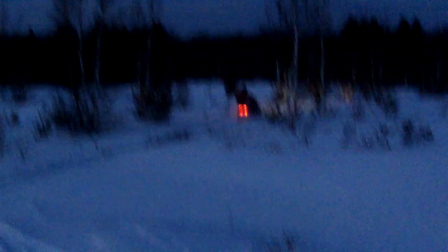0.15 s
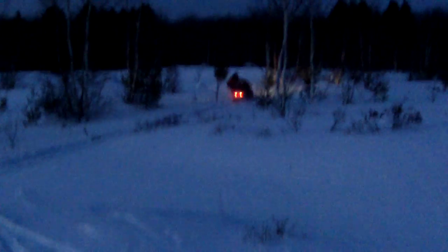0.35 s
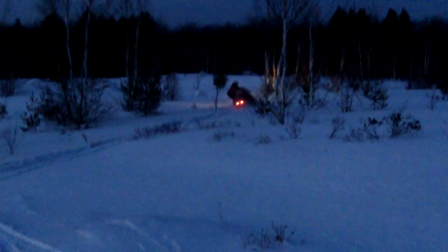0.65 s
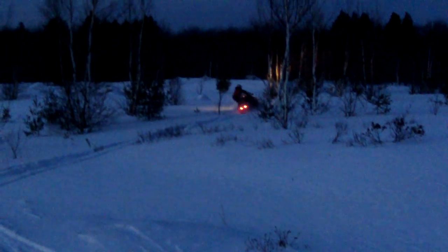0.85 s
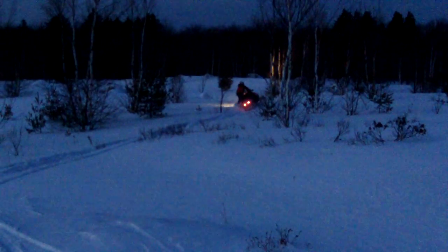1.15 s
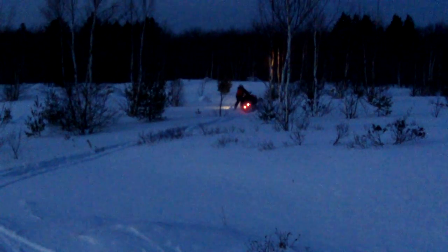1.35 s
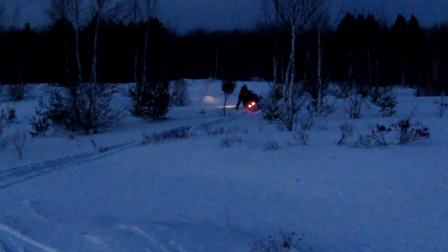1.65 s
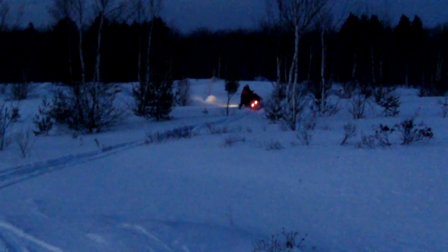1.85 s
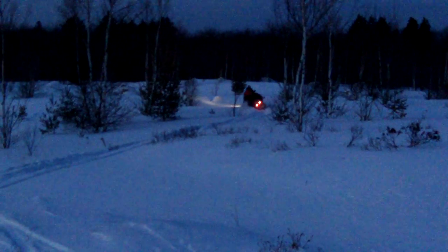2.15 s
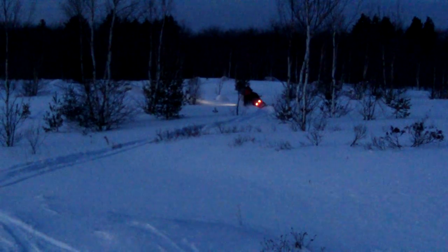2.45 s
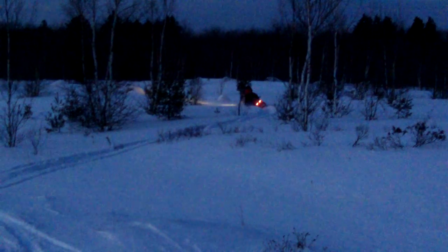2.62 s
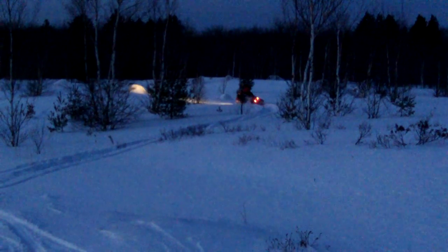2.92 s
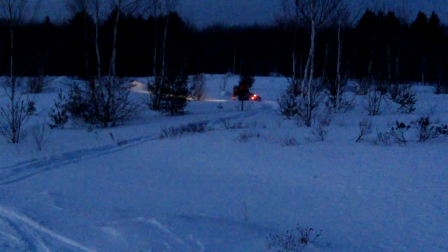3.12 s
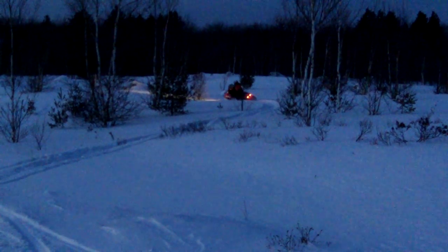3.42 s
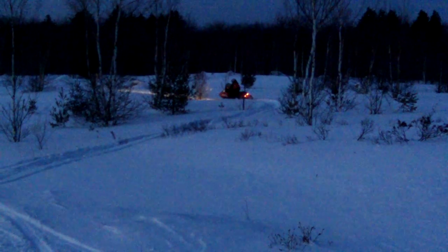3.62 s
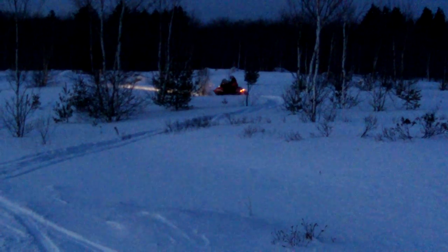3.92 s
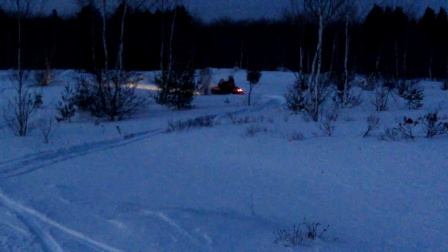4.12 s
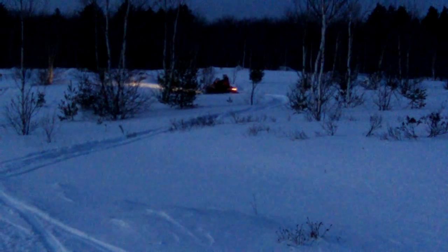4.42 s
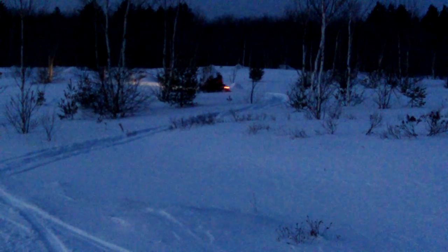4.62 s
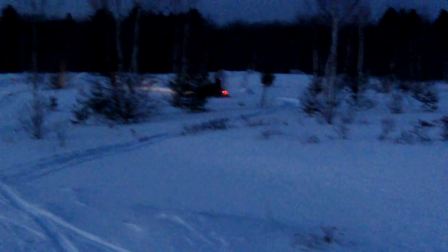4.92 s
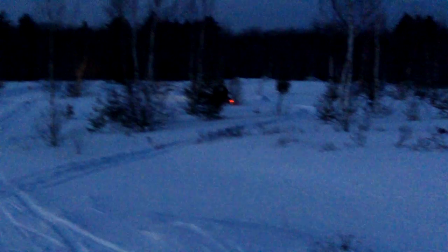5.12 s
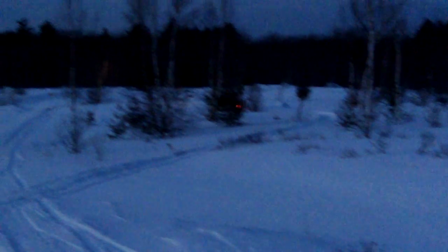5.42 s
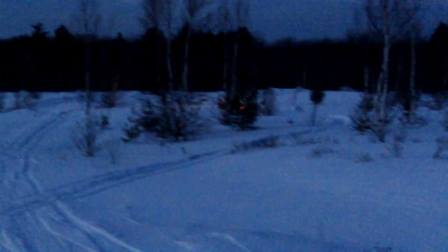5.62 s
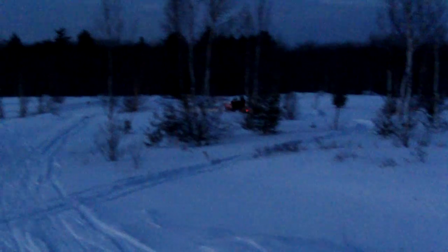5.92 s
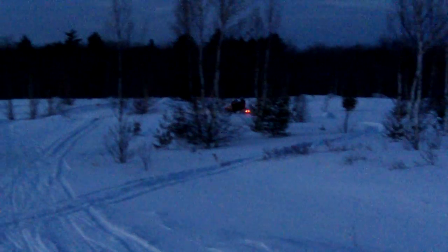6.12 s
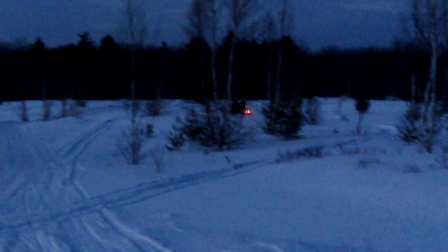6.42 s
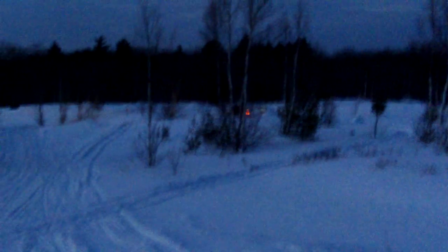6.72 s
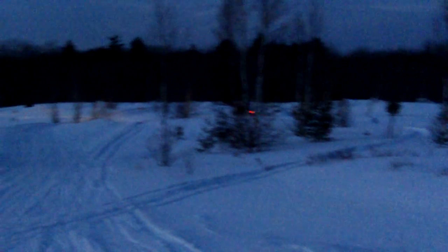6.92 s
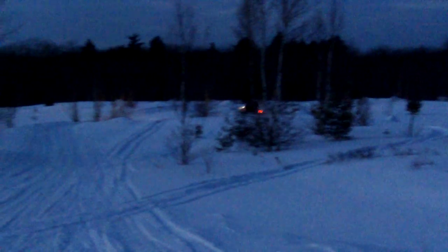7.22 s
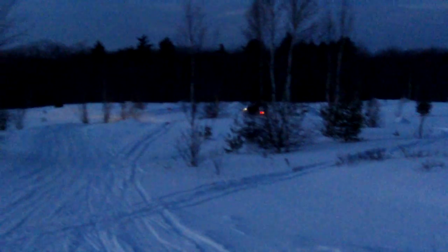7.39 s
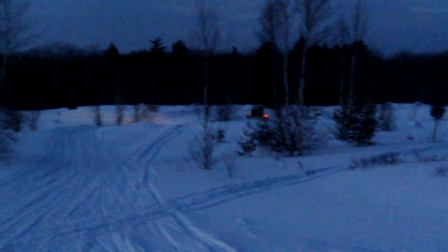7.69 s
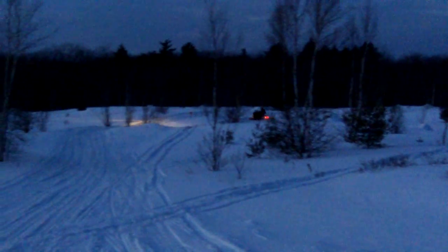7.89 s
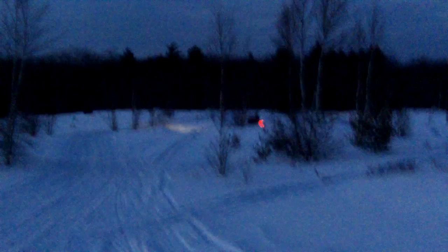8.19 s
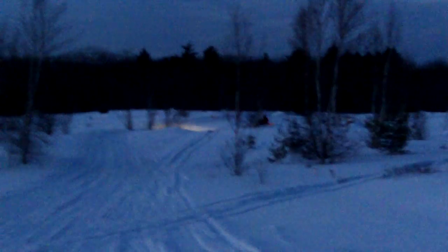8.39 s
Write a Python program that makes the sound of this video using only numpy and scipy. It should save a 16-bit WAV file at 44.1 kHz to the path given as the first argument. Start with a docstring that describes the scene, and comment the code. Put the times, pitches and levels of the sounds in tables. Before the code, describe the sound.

A two-stroke snowmobile buzzes and growls away over snow, revs hard once, then fades into the distance before cloth rustle and handling knocks.

```python
"""A two-stroke twin snowmobile rides away over snow: exhaust orders drone and growl, noise bands churn snow.
It revs up, chokes for a moment before 1.1 s, then cruises; scattered tree echoes spread the exhaust pops.
A small camera whistles faintly throughout and ticks after 4 s; the hardest rev peaks at 5.4 s.
Snow and engine then recede; from 8.1 s a sleeve rustles and a gloved hand knocks, both shaped noise."""
import sys
import numpy as np
from scipy import signal
from scipy.fft import rfft, irfft, next_fast_len
from scipy.io import wavfile
from scipy.ndimage import map_coordinates

SR = 44100
rng = np.random.default_rng(int(sys.argv[2]) if len(sys.argv) > 2 else 0)


def wrap_up_sound(samples):
    """Save the sound to the file named by the first command line argument, as 16-bit audio."""
    columns = np.atleast_2d(samples).T
    # keep every value between -1 and 1, then stretch to whole-number steps
    tamed = np.clip(columns, -1, 1)
    steps = np.round(tamed * 32767).astype(np.int16)
    wavfile.write(sys.argv[1], SR, steps)


N = 377048
TIME_S = np.arange(N) / SR
CUTOFF_HZ = 15300

# engine speed: (time [s], firing rate [Hz])
FIRING = [(0.0, 149.0), (0.24, 137.8), (0.4, 145.2), (0.6, 156.1), (0.8, 169.3), (0.96, 145.8),
          (1.1, 135.5), (1.6, 149.0), (1.92, 150.4), (2.2, 147.5), (2.56, 148.5), (2.83, 140.5),
          (3.05, 146.0), (3.2, 147.5), (3.85, 147.0), (4.24, 154.0), (4.45, 151.0), (4.7, 159.3),
          (4.8, 167.3), (4.9, 177.6), (5.02, 194.7), (5.18, 222.3), (5.32, 247.8), (5.4, 259.0),
          (5.5, 228.0), (5.66, 188.8), (5.8, 175.7), (6.02, 176.7), (6.25, 188.7), (6.5, 162.5),
          (6.85, 143.2), (7.38, 138.7), (7.65, 152.4), (7.86, 157.3), (8.1, 151.8), (8.55, 151.3)]
CRUISE_HZ = 150
# throttle squeezes: (start [s], end [s], opening [0-1], periodic share of the bark [0-1])
SQUEEZES = [(0.432, 0.8, 0.47, 0.7), (1.043, 2.604, 0.57, 0.38), (2.91, 3.496, 0.48, 0.27),
            (3.507, 4.595, 0.34, 0.51), (4.607, 5.412, 0.5, 0.59), (5.785, 6.292, 0.44, 0.49),
            (7.58, 7.965, 0.65, 0.39)]
OPEN_S, CLOSE_S = 0.15, 0.22  # throttle ramp lengths
COAST_SHARE = 0.4  # periodic share off the throttle
# throttle snapped shut: (start [s], end [s], gain of the exhaust orders [dB])
CHOP = (0.79, 1.08, -9)
CATCH_S = 0.056  # ramp back to full exhaust
# engine carry as the sled turns and recedes, used about its mean: (time [s], level [dB])
CARRY = [(0.0, -37.5), (0.1, -42.5), (0.45, -41.5), (0.6, -38), (0.68, -37.5), (0.88, -40.5), (1.2, -39.5),
         (2.0, -39), (2.6, -38), (2.8, -43.5), (3.3, -40.5), (3.5, -43), (4.6, -44), (4.8, -41.5),
         (5.3, -33.5), (5.4, -35), (6.0, -40), (6.2, -39.5), (6.5, -41.5), (7.6, -49), (7.75, -43),
         (8.55, -56)]
# churned snow, used about its mean: (time [s], level [dB])
SNOW = [(0.0, -40.5), (0.5, -41), (0.7, -37.5), (1.4, -46), (1.6, -46.5), (1.9, -52), (2.6, -48),
        (2.7, -51.5), (4.2, -52), (4.3, -52), (4.8, -51), (5.0, -44.5), (5.5, -53), (6.2, -49), (6.8, -58),
        (7.1, -56), (7.3, -58), (8.55, -61)]

# level laws: (offset coasting at cruise [dB], slope with speed [dB/octave], lift at full throttle [dB],
#              share of engine swing [dB/dB], share of snow swing [dB/dB])
BARK_LAW = (-50, 4.5, 0.5, 0.35, 0.56)
RASP_LAW = (-44.5, 3.5, -2.5, 1, 0.4154)
CLATTER_LAW = (-53.5, 11.5, 4, 0, 0.75)
SCRAPE_LAW = (-57.5, 10.5, 0, 0.41, 0.94)
SPRAY_LAW = (-58, 5.5, 1, 0.5, 1)
RUMBLE_LAW = (-55, -8, -3, 1.16, 0.02)
THRUM_LAW = (-82.5, -18, -13, 2, -0.06)
DRONE_LAW = (-0.32, 1, 1, 0.23, 0.028)
GROWL_LAW = (-59.5, 8, 5.5, 0.68, 0.2)
# low mids, added to the bark law: (time [s], level [dB])
LOW_MIDS = [(0, 1), (.42, -0.5), (.66, 2.5), (1.2, 4.5), (1.87, 6), (2.4, -0.5), (3.1, 1), (4, 0), (5, 5),
            (6.7, 3), (8.55, 0)]
# upper mids, added to the clatter law: (time [s], level [dB])
UPPER_MIDS = [(0, -1.5), (.95, 4), (1.6, -2.5), (2.6, -0.5), (3.55, 2.5), (4.5, 3), (5.3, 2), (6, -2.5),
              (7, -2.5), (7.85, 1), (8.55, -8.5)]

# exhaust pop spectrum: (frequency [Hz], relative gain [dB])
PIPE_COLOUR = [(150, -70), (330, -14), (520, -20.5), (750, -2), (1000, 9), (1350, 2), (1700, 7), (2300, 5),
               (3000, -9)]
PIPE_DELAY_S = 0.018  # a pop leaves the cylinder this long before it is heard
POPS_IN_BARK_DB = -5  # in the mids the growl covers the single pops
# engine and track noise spectrum: (frequency [Hz], relative gain [dB])
COLOUR = [(60, -47), (120, -29.5), (200, -25.5), (330, -14), (600, -5.5), (1000, 10), (2200, 16),
          (3000, 1.5), (4500, -4.5), (6500, -13), (9200, -23), (10500, -29.5), (12000, -28.5), (15000, -39)]
# hood and chassis resonances and dips: (centre [Hz], width [Hz], gain [dB])
PANELS = [(994, 39, 1.5), (1140, 110, 1.5), (1490, 110, -8.5), (1595, 390, 9.5), (2315, 120, 3),
          (2574, 400, 9.5), (2830, 100, -3.5), (3330, 69, 2), (4500, 120, -3), (6040, 300, 2),
          (7000, 350, 0), (8270, 270, 3), (9270, 960, 3.5)]
# share of noise carrying the chassis resonances, less as the sled recedes: (time [s], share [0-1])
NEARNESS = [(0, 0.74), (1, 1), (1.8, 0.74), (2.6, 1), (3.5, 0.88), (5, 0.91), (6, 0.42), (8.55, 0.08)]
# tuned pipe's response to the lowest orders: (frequency [Hz], level [dB])
PIPE_TONES = [(135, -86), (180, -77), (260, -70), (300, -65.5), (360, -63.5), (430, -52), (470, -61.5),
              (520, -57), (590, -51), (660, -48), (760, -52), (1000, -48)]
BOOM_DB = 7.5  # lift of the two lowest orders at full throttle
# level offset of firing orders 1 to 4, one table each: (time [s], level [dB])
FIRST = [(0, 8.5), (1, 6), (2.85, 2), (3.8, 2), (4.2, -5.5), (5.25, -0.5), (5.5, 3), (7.3, -9.5), (8.55, 2)]
SECOND = [(0, 1.5), (1.6, 6.5), (2.55, -6), (2.9, 0.5), (4.55, 5.5), (5.15, 4.5), (5.5, -17), (6, 3.5),
          (6.4, -24), (7.1, -10), (7.6, 1.5), (8.55, -23)]
THIRD = [(0, -12), (.7, 5.5), (1.1, -3.5), (1.6, 2), (2.6, -3), (3.6, 2), (4.7, -8), (5.3, -11), (5.44, 3),
         (5.56, -9), (6.8, -8.5), (7.35, 1), (7.7, -11), (8.55, 0)]
FOURTH = [(0, -3), (.5, -4), (.66, 6), (.8, 3), (.9, -5), (1.8, 4), (2.6, -1), (3.08, -26), (3.45, -2),
          (4.0, -4), (4.3, -19), (4.7, -4), (4.9, -31), (5.7, -14), (5.88, 2.5), (6.3, -7), (6.45, -7),
          (6.58, -1.5), (7.3, -9), (7.8, -3), (8.55, -9.5)]
# growl orders; half orders come from the unequal cylinders: (firing order [-], relative level [dB])
GROWL_ORDERS = [(1.5, -4), (2.5, -4), (3.5, 2), (4.5, 0.5), (5, 0.5), (5.5, 0), (6, 5), (6.5, 0), (7, 1),
                (7.5, -0.5), (8, -2.5), (8.5, 1), (9, 0.5), (9.5, -1), (10, 0.5), (10.5, -4), (11, 1),
                (11.5, -4), (12, 0), (12.5, -3), (13, -2), (13.5, -4), (14, 0), (15, -1), (16, 0), (17, -1),
                (18, -3)]
# pipe's response to the growl orders: (frequency [Hz], gain [dB])
GROWL_COLOUR = [(220, -28), (350, -15), (500, -6), (610, -5), (700, 0), (820, -0.5), (930, 1), (1030, 3),
                (1200, 1), (1450, 1), (1700, 3), (2000, 0), (2300, 0.5), (2650, -1), (3100, -9),
                (4200, -15)]
# whines of pipe, fan or cover: (start [s], end [s], firing order [-], level at mid-swell [dB])
WHINES = [(0.31, 0.44, 11, -47), (0.35, 0.48, 7, -54), (0.78, 0.9, 9.5, -47), (1.29, 1.49, 11, -48.5),
          (1.35, 2.05, 7, -57), (0.52, 0.8, 10, -52), (1.5, 2.15, 6.5, -52), (2.85, 3.04, 15, -48),
          (2.9, 3.3, 18, -51), (2.94, 3.42, 11, -47), (3.5, 3.85, 11, -58), (3.65, 4.15, 5.5, -56),
          (3.15, 3.4, 15, -56), (3.45, 3.8, 22.5, -55), (4.08, 4.5, 7.5, -59), (4.48, 4.76, 4.5, -60),
          (4.55, 4.73, 14, -55), (5.2, 5.4, 7, -46), (5.22, 5.38, 7.5, -48), (5.85, 6.35, 11, -56),
          (5.9, 6.4, 13, -54), (7.05, 7.55, 5.5, -67), (7.62, 7.98, 6, -59)]
# ringing cover, chassis and running gear: (start [s], end [s], pitch [Hz], width [Hz], level [dB])
RINGS = [(0.0, 0.55, 5360, 220, -52.5), (0.2, 0.5, 3300, 130, -50), (0.5, 1.11, 5340, 280, -46),
         (0.78, 1.082, 1560, 200, -42), (2.147, 2.7, 1650, 150, -46.5), (2.15, 2.6, 3270, 130, -56),
         (4.852, 5.2, 4380, 450, -45.5), (5.2, 5.35, 2560, 150, -40), (5.45, 5.847, 2200, 220, -46),
         (5.897, 6.416, 2310, 170, -43), (5.95, 6.748, 4350, 480, -54.5), (6.95, 7.2, 6750, 650, -60.5),
         (7.5, 8.0, 5400, 480, -65), (7.55, 8.0, 1920, 220, -65)]

# grazing echo off the snow, shifting as the sled turns: (time [s], lag [ms], strength [0-1])
GLANCE = [(1.1, .25, 0), (1.5, .25, .07), (2.5, .25, .07), (3, .2, .05), (4.6, .18, .05), (5.3, .2, 0),
          (5.7, .26, .13), (6.3, .305, .22), (6.85, .36, .22), (7.4, .4, .22), (7.8, .42, .28),
          (8.55, .43, .1)]
# echoes off bumps in the snow
BUMP_STRENGTH, BUMP_CHANGE_HZ = 0.2, 0.8

# camera whistle: (pitch [Hz], warble [Hz], warble depth [rad], level [dB])
WHISTLE = (7867, 30, 1.9, -65.3)
# camera body ticks: (time [s], relative envelope peak [dB])
TICKS = [(4.1579, -40), (4.1754, -31), (4.1885, -33), (4.584, -35)]
# gloved hand knocks: (time [s], relative envelope peak [dB])
KNOCKS = [(8.421, -36), (8.443, -42), (8.458, -52), (8.480, -30.5), (8.534, -31)]
# sleeve rustle: (time [s], level [dB])
RUSTLE = [(0, -100), (8.1, -67), (8.23, -52), (8.32, -57.5), (8.4, -55), (8.44, -49.5), (8.49, -48),
          (8.55, -54)]
# rubbing cloth spectrum: (frequency [Hz], relative gain [dB])
CLOTH = [(40, -38), (110, -21), (200, -10), (600, 0.5), (2000, -7.5), (6000, -15), (15000, -28)]
# still air and microphone hiss spectrum: (frequency [Hz], relative gain [dB])
AIR = [(30, -19), (100, -8), (400, -29), (1500, -15), (5000, -12), (9000, 8), (11000, -1), (15000, 1.5)]


def sled():
    """Firing rate and throttle drive every exhaust, engine and track layer."""
    firing_hz = in_time(FIRING)[0]
    cycle = np.cumsum(firing_hz) / SR  # firings so far
    opening, share = throttle()
    state = controls(firing_hz, opening)
    low_orders = level(DRONE_LAW, state) * drone(cycle, firing_hz, opening, flutter_db=1.2, wobble_rad=0.061)
    mid_orders = growl(cycle, firing_hz, flutter_db=2.8, wobble_rad=0.045)
    mid_orders = level(GROWL_LAW, state) * share * mid_orders  # growl needs even firing
    high_orders = whine(cycle, flutter_db=1.2, wobble_rad=0.12)
    body = machine(cycle, firing_hz, share, state)
    return body + choke() * (low_orders + mid_orders) + high_orders + rings(cycle, throb=0.42)


def drone(cycle, firing_hz, opening, flutter_db, wobble_rad):
    """The tuned pipe sings the four lowest firing orders as near-pure tones; throttle swells the lowest two."""
    out = np.zeros(N)
    points_hz, points_db = np.transpose(PIPE_TONES)
    for order, curve in enumerate((FIRST, SECOND, THIRD, FOURTH), 1):
        db = np.interp(np.log(order * firing_hz), np.log(points_hz), points_db)
        db = db + in_time(curve)[0] + BOOM_DB * opening * (order <= 2)
        gain = from_db(db + flutter_db * drift(31))
        phase = 2 * np.pi * order * cycle + wobble_rad * order * drift(19)
        out += np.sqrt(2) * gain * np.sin(phase)
    return out


def growl(cycle, firing_hz, flutter_db, wobble_rad):
    """Whole and half orders of the two unequal cylinders sweep through the pipe's resonances."""
    out = np.zeros(N)
    points_hz, points_db = np.transpose(GROWL_COLOUR)
    for order, order_db in GROWL_ORDERS:
        db = np.interp(order * firing_hz, points_hz, points_db) + order_db
        gain = from_db(db + flutter_db * drift(10.0))
        phase = 2 * np.pi * order * cycle + spread_rad(order) + wobble_rad * order * drift(21.5)
        out += np.sqrt(2) * gain * np.sin(phase)
    return out


def spread_rad(order):
    """The pipe delays each order differently, so a firing is a drawn-out bark, not a click."""
    return np.sqrt(2) * order ** 2


def whine(cycle, flutter_db, wobble_rad):
    """Single firing orders sing out and fade over set spans, gliding with engine speed."""
    out = np.zeros(N)
    flutter = from_db(flutter_db * drift(18))
    waver = wobble_rad * drift(8.9)
    for start_s, end_s, order, db in WHINES:
        on, swell = rise_and_fall(start_s, end_s)
        tone = np.sin(2 * np.pi * order * cycle[on] + waver[on])
        out[on] += np.sqrt(2) * from_db(db) * swell * flutter[on] * tone
    return out


def machine(cycle, firing_hz, share, state):
    """Exhaust pops and engine and track noise in bands; the periodic share sets the mix in bark and edge."""
    pops = exhaust(cycle, firing_hz)
    noise = rasp(cycle, throb=0.034, half_throb=0.028, judder_db=0.7)
    rumble = band(noise, 100, 680) + 0.65 * np.sqrt(share) * band(pops, 220, 680)
    rumble = level(RUMBLE_LAW, state) * rumble
    thrum = level(THRUM_LAW, state) * band(rng.standard_normal(N), 50, 144, order=1)
    bark = blend(pops, noise, share, 624, 1468, POPS_IN_BARK_DB)
    bark = level(BARK_LAW, state) * from_db(in_time(LOW_MIDS)[0]) * bark
    # higher up, pulses need a larger share to stand out of the turbulence
    edge = level(RASP_LAW, state) * blend(pops, noise, share ** 1.8, 1534, 5230)
    clatter = level(CLATTER_LAW, state) * from_db(in_time(UPPER_MIDS)[0]) * band(noise, 2835, 4160)
    scrape = level(SCRAPE_LAW, state) * band(noise, 4180, 7360)
    spray = level(SPRAY_LAW, state) * band(noise, 7150, 17600)
    clumps = from_db(0.59 * drift(49))  # the track throws snow in lumps
    return thrum + np.sqrt(choke()) * (rumble + bark) + edge + clatter + clumps * (scrape + spray)


def exhaust(cycle, firing_hz):
    """Pops pass the ringing pipe, scatter off trees and glance off the snow."""
    pops = exhaust_pulses(cycle, firing_hz, jitter_s=0.000018, uneven=0.037, weak_db=-7.5, skew=0.058)
    pops = trees(pipe(pops, smear_s=0.034), wet_db=-3, t60_s=0.12)
    return glance(coloured(pops, PIPE_COLOUR))


def exhaust_pulses(cycle, firing_hz, jitter_s, uneven, weak_db, skew):
    """One pop per firing; the second cylinder is weaker and late, which adds half orders."""
    number = np.arange(int(cycle[-1]))
    second = number % 2
    chance = rng.standard_normal((len(number), 2))
    at_s = np.interp(number + skew * second, cycle, TIME_S) - PIPE_DELAY_S + jitter_s * chance[:, 0]
    at = np.clip((at_s * SR).astype(int), 0, N - 1)
    pops = np.zeros(N)
    pops[at] = from_db(weak_db * second) * (1 + uneven * chance[:, 1])
    return rms_one(pops / np.sqrt(firing_hz))  # even power at any speed


def pipe(x, smear_s):
    """The expansion chamber spreads each pop over several firings, lows last."""
    size = next_fast_len(N + SR // 10)
    hz = np.fft.rfftfreq(size, 1 / SR)
    lag_s = smear_s * np.exp(-hz / 1500)
    phase_turns = np.cumsum(lag_s) * SR / size  # group delay summed over frequency
    return irfft(rfft(x, size) * np.exp(-2j * np.pi * phase_turns), size)[:N]


def rasp(cycle, throb, half_throb, judder_db):
    """Turbulence and rattle surge with each firing and judder at random; the chassis colours them when near."""
    surge = 1 + throb * np.cos(2 * np.pi * cycle) + half_throb * np.cos(np.pi * cycle)
    rattle = rng.standard_normal(N) * surge * from_db(judder_db * drift(26))
    near = np.clip(in_time(NEARNESS)[0], 0, 1)
    ringing, plain = coloured(rattle, COLOUR, PANELS), coloured(rattle, COLOUR)
    return bumps(glance(near * ringing + (1 - near) * plain))


def blend(pops, noise, share, low_hz, high_hz, pops_db=0):
    """One band of pops and noise, mixed by power share."""
    periodic = from_db(pops_db) * np.sqrt(share) * band(pops, low_hz, high_hz)
    return periodic + np.sqrt(1 - share) * band(noise, low_hz, high_hz)


def rings(cycle, throb):
    """Rattle pulsing with the firing excites one narrow panel or running-gear resonance at a time span."""
    out = np.zeros(N)
    rattle = rng.standard_normal(N) * (1 + throb * np.cos(2 * np.pi * cycle))
    for start_s, end_s, hz, width_hz, db in RINGS:
        on, swell = rise_and_fall(start_s, end_s)
        b, a = signal.iirpeak(hz, hz / width_hz, fs=SR)
        out[on] += from_db(db) * swell * rms_one(signal.lfilter(b, a, rattle[on]))
    return out


def throttle():
    """Throttle opening and periodic share of the firing, per sample."""
    opening, share = np.zeros(N), np.full(N, COAST_SHARE)
    for start_s, end_s, strength, even in SQUEEZES:
        rise = np.clip((TIME_S - start_s) / OPEN_S + 0.5, 0, 1)
        fall = np.clip((end_s - TIME_S) / CLOSE_S + 0.5, 0, 1)
        opening += strength * rise * fall
        share += (even - COAST_SHARE) * rise * fall
    return opening, np.clip(share, 0, 1)


def choke():
    """Exhaust gain: dies away as the throttle snaps shut, returns fast as it reopens."""
    start_s, end_s, db = CHOP
    shut = np.clip((TIME_S - start_s) / CLOSE_S, 0, 1)
    return from_db(db * shut * np.clip((end_s - TIME_S) / CATCH_S, 0, 1))


def controls(firing_hz, opening):
    """Rows behind every level law: 1, octaves above cruise, throttle, engine swing and snow swing in dB."""
    carry_db, snow_db = in_time(CARRY)[0], in_time(SNOW)[0]
    octaves = np.log2(firing_hz / CRUISE_HZ)
    return np.array([np.ones(N), octaves, opening, carry_db - carry_db.mean(), snow_db - snow_db.mean()])


def level(law, state):
    """Layer gain: the law weighs the controls and sums them in dB."""
    return from_db(np.dot(law, state))


def glance(x):
    """A close, inverted echo off the snow combs the treble; its notches slide with the lag."""
    lag_ms, strength = in_time(GLANCE)
    late = map_coordinates(x, [np.arange(N) - lag_ms * SR / 1000], order=1)
    return (x - strength * late) / np.sqrt(1 + strength ** 2)


def bumps(x, count=8):
    """Short echoes of wandering strength off bumps ripple the spectrum as the sled moves."""
    lags = (rng.uniform(0.0012, 0.0065, count) * SR).astype(int)  # drawn in s
    echoes = sum(drift(BUMP_CHANGE_HZ) * np.pad(x, (lag, 0))[:N] for lag in lags) / np.sqrt(count)
    return (x + BUMP_STRENGTH * echoes) / np.sqrt(1 + BUMP_STRENGTH ** 2)


def trees(x, wet_db, t60_s):
    """Trunks and bushes return many faint, scattered, decaying echoes."""
    lags_s = rng.uniform(0.00377, 0.3, size=120)
    echoes = np.zeros(SR)
    echoes[(lags_s * SR).astype(int)] = rng.standard_normal(len(lags_s)) * from_db(-60 * lags_s / t60_s)
    return x + from_db(wet_db) * signal.fftconvolve(x, echoes / np.linalg.norm(echoes))[:N]


def camera():
    """A phase-warbled sine whistle and short noise ticks of the body."""
    hz, warble_hz, depth_rad, db = WHISTLE
    warble = depth_rad * np.sin(2 * np.pi * warble_hz * TIME_S)
    whistle = np.sqrt(2) * from_db(db) * np.sin(2 * np.pi * hz * TIME_S + warble + 0.1 * drift(8))
    return whistle + from_db(-7) * bursts(TICKS, 6000, 12000, decay_s=0.0022)


def clothing():
    """Crumpling cloth is unsteady coloured noise; glove knocks are low noise puffs."""
    crumple = from_db(2.3 * drift(70))
    cloth = coloured(rng.standard_normal(N) * crumple, CLOTH)
    knocks = from_db(-8) * bursts(KNOCKS, 330, 900, decay_s=0.005)
    return from_db(in_time(RUSTLE)[0]) * cloth + knocks


def bursts(events, low_hz, high_hz, decay_s):
    """Each touch is a short, dying puff of band-limited noise."""
    envelope = np.zeros(N)
    for at_s, db in events:
        envelope += from_db(db) * (TIME_S >= at_s) * np.exp(-np.abs(TIME_S - at_s) / decay_s)
    puffs = band(envelope * rng.standard_normal(N), low_hz, high_hz, order=2)
    return np.sqrt(np.mean(envelope ** 2)) * puffs


def still_air():
    """Steady coloured hiss."""
    return from_db(-69) * coloured(rng.standard_normal(N), AIR)


def from_db(db):
    """Decibels to gain."""
    return np.exp(np.asarray(db) * np.log(10) / 20)


def rms_one(x):
    """Scale to unit rms."""
    return x / np.sqrt(np.mean(x ** 2) + 1e-20)


def in_time(rows):
    """Each column of a table, interpolated per sample."""
    at_s, *columns = np.transpose(rows)
    return [np.interp(TIME_S, at_s, column) for column in columns]


def drift(rate_hz):
    """Random wander of unit rms: noise through a double pole, at 1/40 of the sample rate."""
    pole = np.exp(-80 * np.pi * rate_hz / SR)
    noise = rng.standard_normal(N // 40 + 2002)
    slow = signal.lfilter([1], [1, -2 * pole, pole * pole], noise)[2000:]  # drop the run-in
    return np.interp(np.arange(N) / 40, np.arange(len(slow)), rms_one(slow))


def rise_and_fall(start_s, end_s):
    """Mask of a time span, and a rounded swell over it."""
    on = (TIME_S > start_s) & (TIME_S < end_s)
    return on, np.sqrt(np.sin(np.pi * (TIME_S[on] - start_s) / (end_s - start_s)))


def band(x, low_hz, high_hz, order=3):
    """Zero-phase band-pass, unit rms."""
    sos = signal.butter(order, [low_hz, min(high_hz, SR / 2 - 1)], "band", fs=SR, output="sos")
    return rms_one(signal.sosfiltfilt(sos, x, padtype="even", padlen=SR // 2))


def coloured(x, spectrum, resonances=()):
    """Filter x by a broad spectrum with resonant humps and dips; unit rms."""
    size = next_fast_len(N)
    hz = np.maximum(np.fft.rfftfreq(size, 1 / SR), 1)
    points_hz, points_db = np.transpose(spectrum)
    db = np.interp(np.log(hz), np.log(points_hz), points_db)
    for centre_hz, width_hz, lift_db in resonances:
        db = db + lift_db / (1 + (2 * (hz - centre_hz) / width_hz) ** 2)
    return rms_one(irfft(rfft(x, size) * from_db(db), size)[:N])


def scene():
    """Sled, camera, clothing and still air, in one channel."""
    return (sled() + camera() + clothing() + still_air())[None]


def record(dry):
    """Steep elliptic low-pass."""
    return signal.sosfilt(signal.ellip(12, 0.1, 70, CUTOFF_HZ, fs=SR, output="sos"), dry)


dry = scene()
out = record(dry)
wrap_up_sound(out)
```